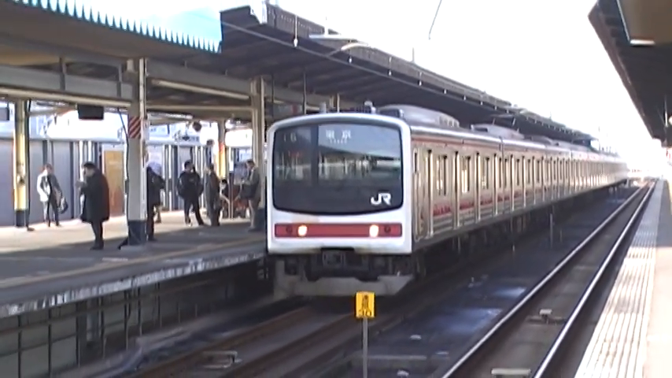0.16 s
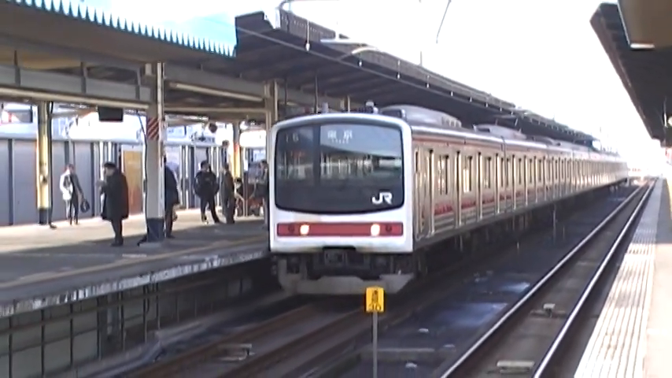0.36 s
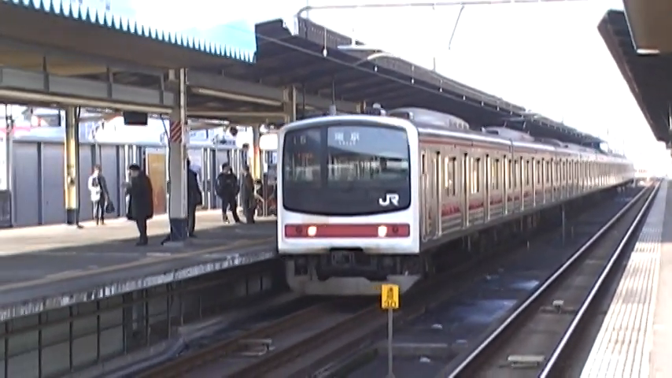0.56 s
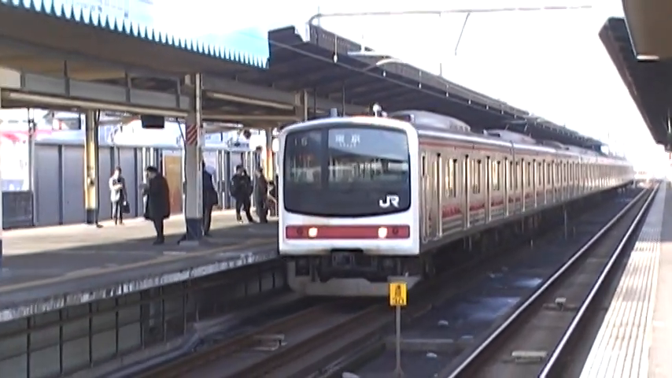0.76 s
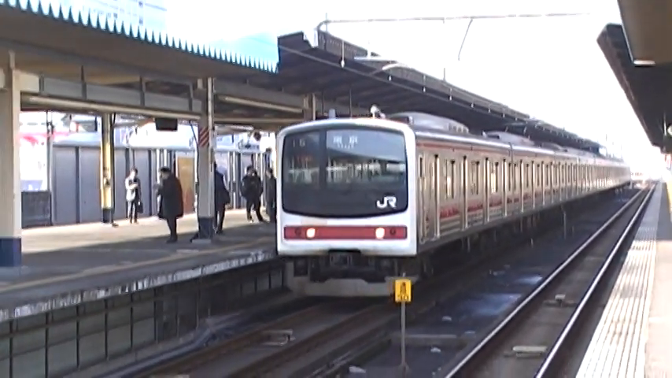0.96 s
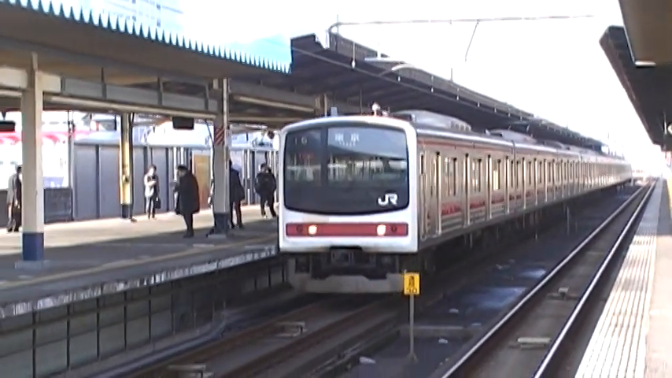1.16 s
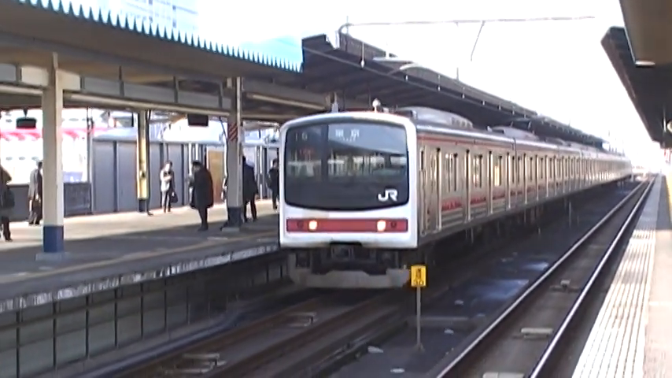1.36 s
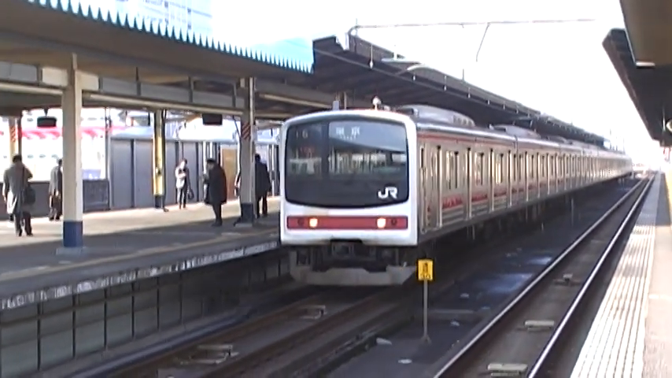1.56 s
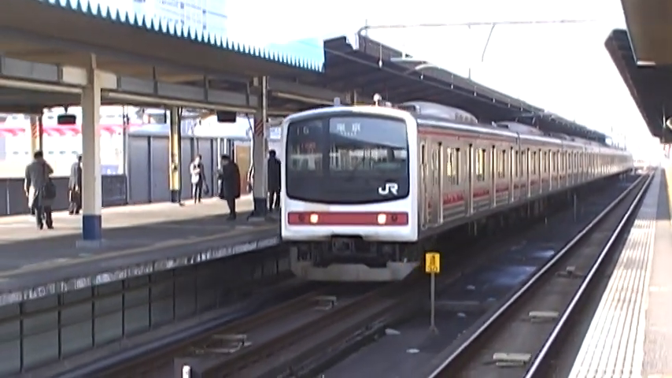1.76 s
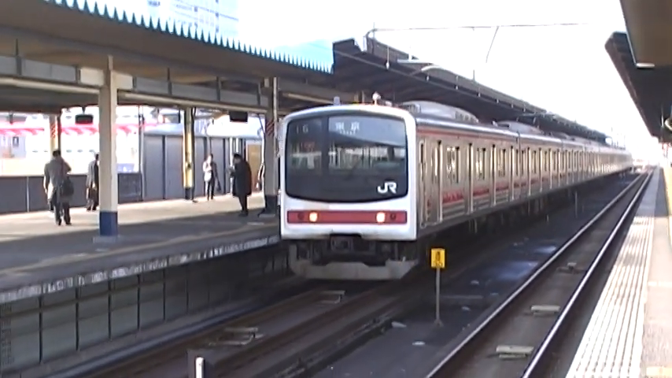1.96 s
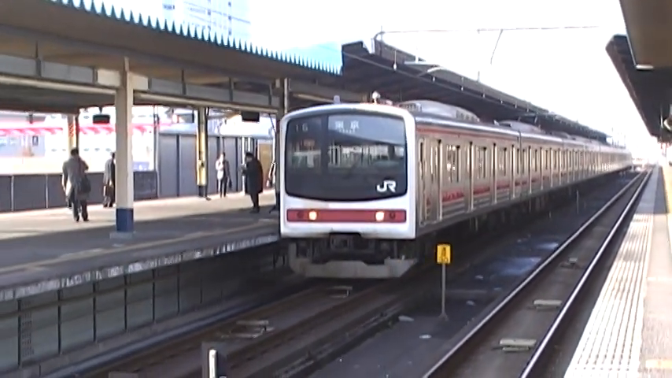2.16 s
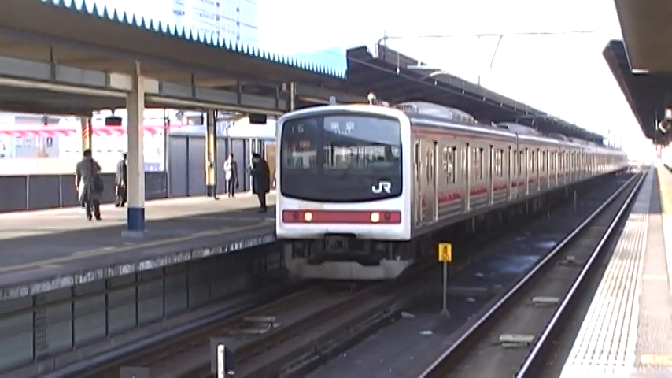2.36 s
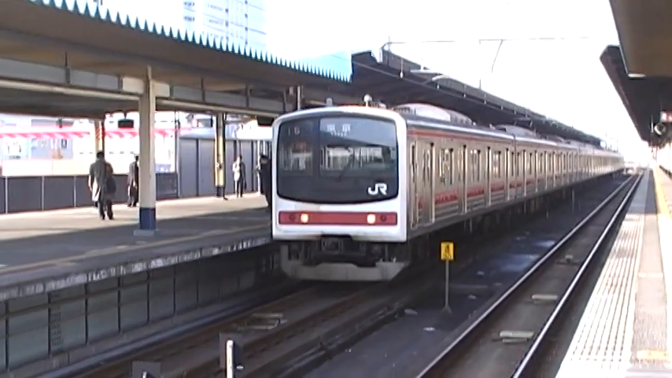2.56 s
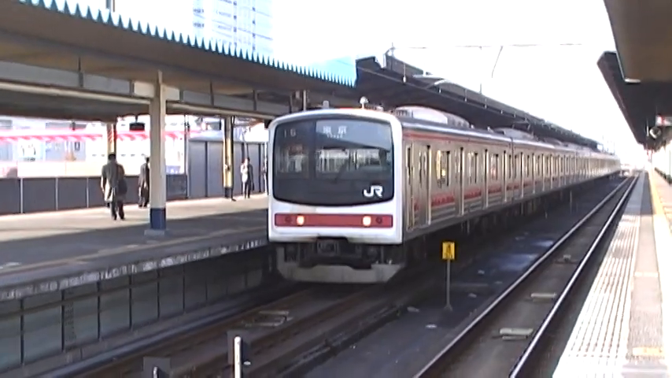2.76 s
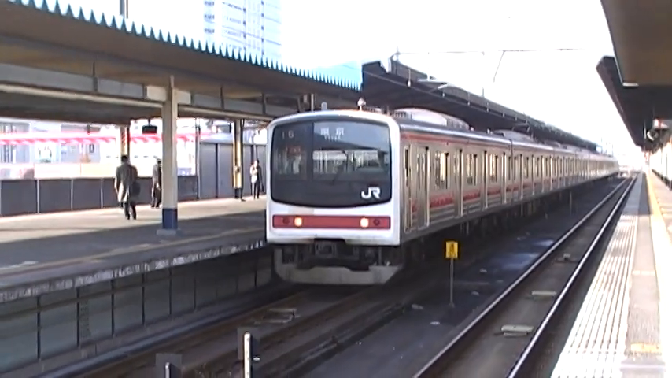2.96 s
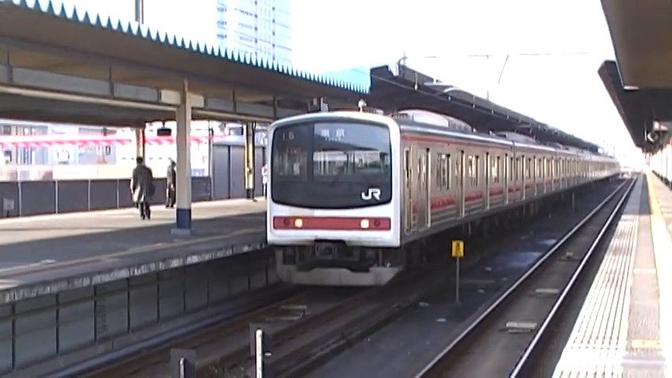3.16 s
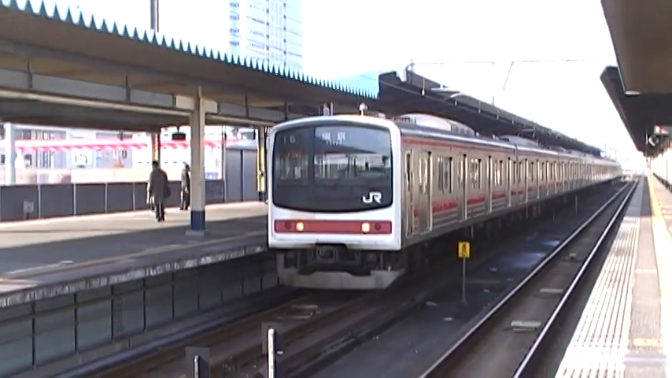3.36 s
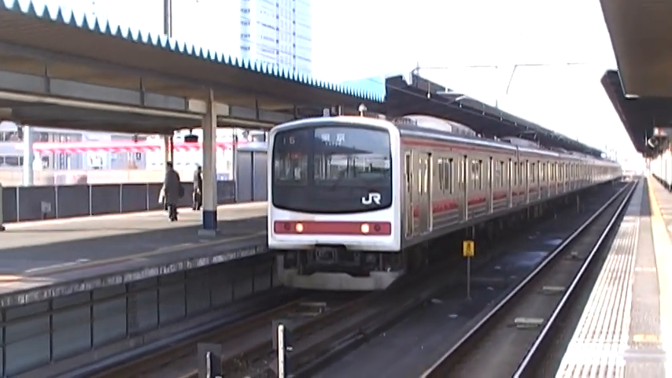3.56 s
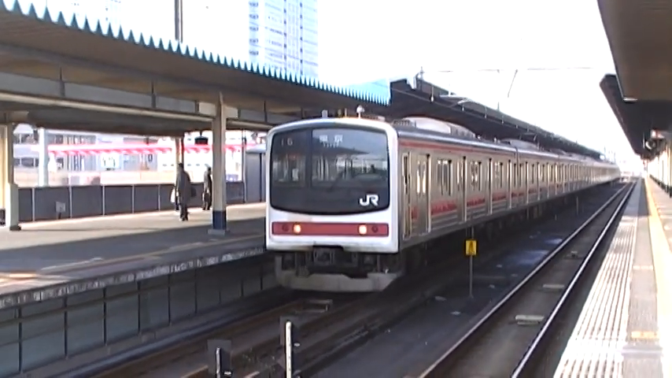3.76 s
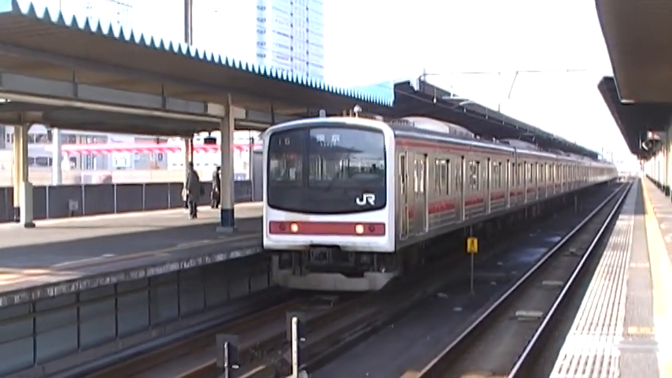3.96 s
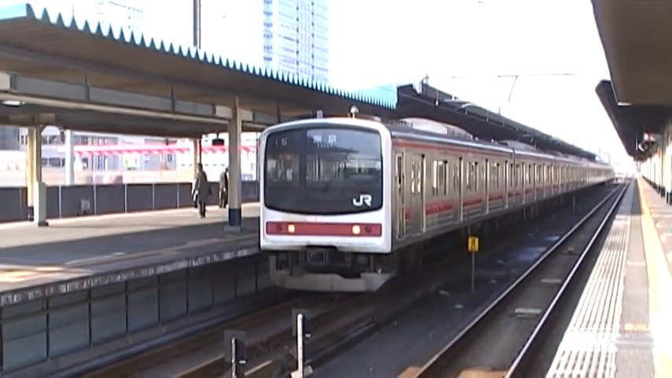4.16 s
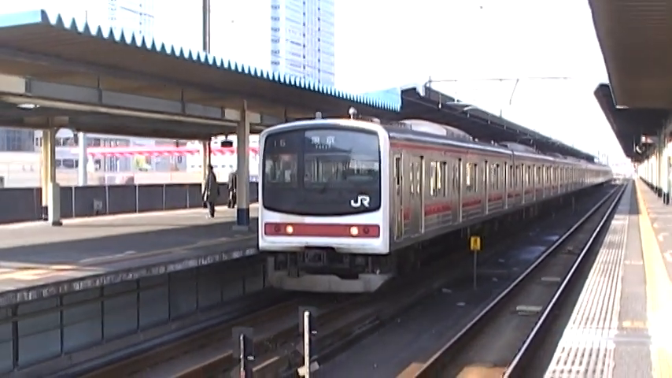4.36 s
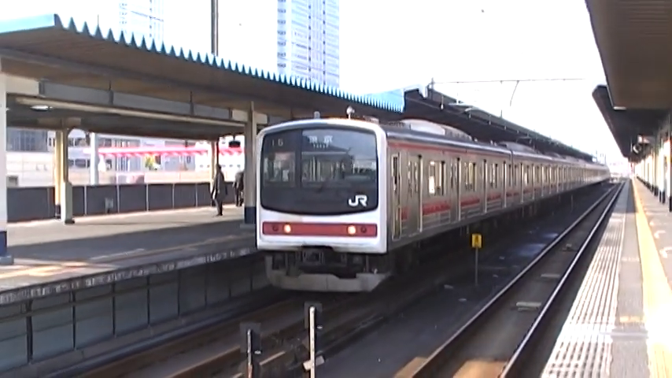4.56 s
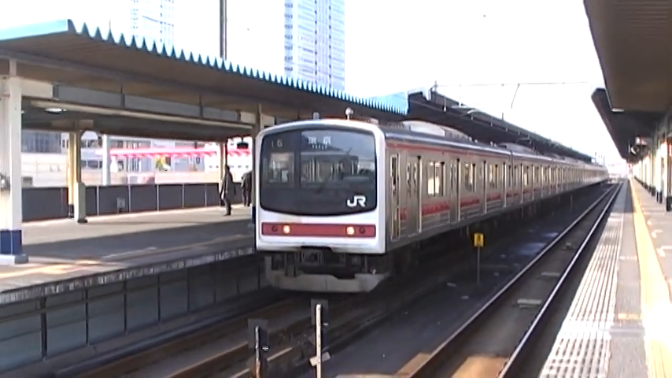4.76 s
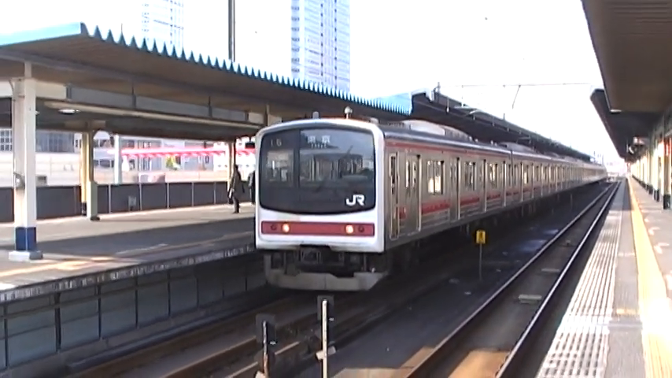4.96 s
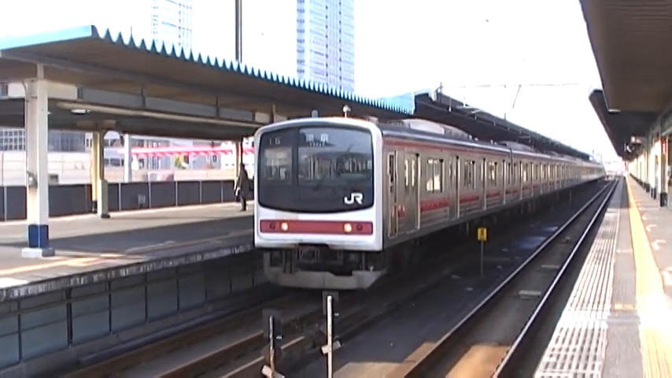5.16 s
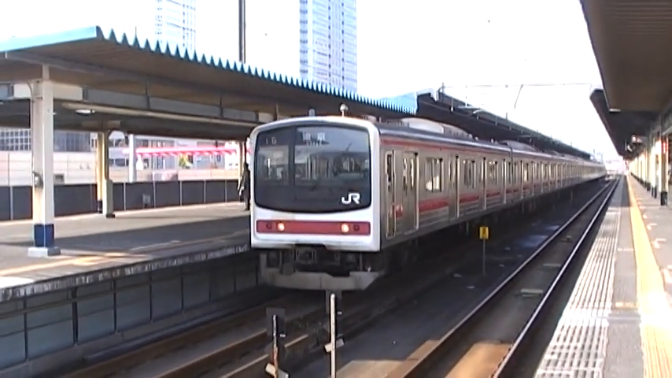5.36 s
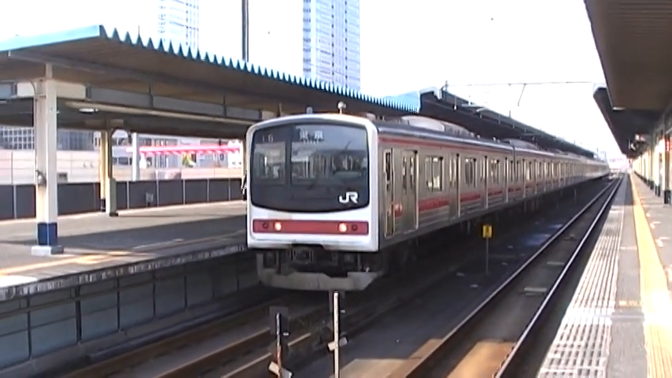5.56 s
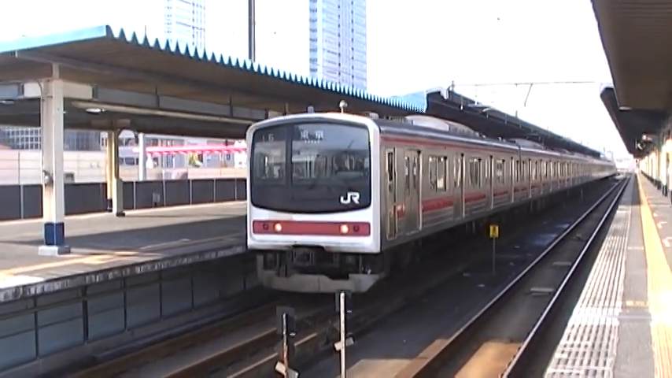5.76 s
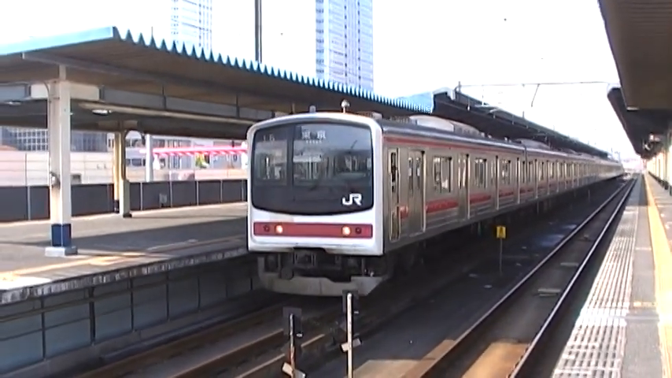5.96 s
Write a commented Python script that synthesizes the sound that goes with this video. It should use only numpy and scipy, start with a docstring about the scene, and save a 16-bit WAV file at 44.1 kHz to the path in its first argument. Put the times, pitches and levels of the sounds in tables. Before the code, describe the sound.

A commuter train brakes beside a covered platform. Low rumble and rolling roar gradually fade over steady airy station noise. Gritty falling chirps and higher squeals repeat with every wheel turn, growing louder and more widely spaced, while a wavering metallic singing swells beneath. Near the end come clean shrieks and two hoarse crow-like caws. The wide stereo microphone stands on the platform, with the brakes slightly left and a short bright echo from the roof.

```python
"""An electric commuter train brakes along a roofed platform, slowing and coming nearer.
From the start filtered noise gives its fading rumble and roar over steady station noise, and steadily
rubbing shoes sing by stick-slip. Wheel spots meet the shoes once a turn, so a pattern of falling chirps
and high squeals repeats ever slower and louder, answered by a decaying-noise echo of the roof.
Near the end come clean shrieks and two hoarse calls, likely a crow: a rough voice through a throat resonance."""
import sys
import numpy as np
from scipy import signal
from scipy.fft import rfft, irfft, next_fast_len
from scipy.io import wavfile
from scipy.ndimage import map_coordinates

SR = 44100
rng = np.random.default_rng(int(sys.argv[2]) if len(sys.argv) > 2 else 0)


def materialize(psi):
    """Save the field psi as 16-bit PCM at rate SR to the path in sys.argv[1].

    A 1-D psi becomes a single channel; in a 2-D psi each row is a channel.
    """
    bounded = np.clip(np.atleast_2d(psi).T, -1, 1)
    quanta = np.round(bounded * 32767).astype(np.int16)
    wavfile.write(sys.argv[1], SR, quanta)


N = 268965


def amp(db):
    """Logarithmic level: decibels to amplitude gain."""
    return 10 ** (np.asarray(db) / 20)


def unit(x):
    """Root-mean-square normalisation: scale to rms 1."""
    return x / np.sqrt(np.mean(x ** 2) + 1e-20)


def along(points, hz):
    """Logarithmic frequency scale: interpolate (frequency, value) points on it."""
    f, v = np.transpose(points)
    return np.interp(np.log(hz + 1), np.log(f + 1), v)


def wobble(rate, size=N):
    """Band-limited random fluctuation: a smooth curve through rate random knots a second."""
    knots = rng.standard_normal(size // 16 + 8)
    return map_coordinates(knots, [np.arange(size) * rate / SR], mode="wrap")


def filtered(x, response):
    """Linear filtering: multiply the spectrum by a response of frequency."""
    m = next_fast_len(N + SR // 4)
    return irfft(rfft(x, m) * response(np.fft.rfftfreq(m, 1 / SR)), m)[..., :N]


# Likeness of left and right in wide noise: (frequency [Hz], correlation [0-1])
LEFT_RIGHT_LIKENESS = [(40, 0.94), (150, 1), (400, 0.96), (800, 0.92), (1600, 0.82), (8000, 0.56)]


def rush(spectrum):
    """Partial coherence: coloured stereo noise of rms 1, nearly mono in the bass."""
    def mid_side_response(hz):
        # mid and side at this angle give the wanted left-right correlation
        angle = np.arccos(np.clip(along(LEFT_RIGHT_LIKENESS, hz), -1, 1)) / 2
        return amp(along(spectrum, hz)) * [np.cos(angle), np.sin(angle)]

    mid, side = filtered(rng.standard_normal((2, N)), mid_side_response)
    return unit(np.array([mid + side, mid - side]))


def gate(t, length, rise, fall):
    """Onset and free decay: swell, hold until length, then ring out exponentially (all in s)."""
    return (1 - np.exp(-(t / rise) ** 2)) * np.exp(-np.maximum(t - length, 0) / fall)


def add(track, s, sound):
    """Superposition: mix a sound into the track at time s."""
    start = max(round(s * SR), 0)
    track[start:start + len(sound)] += sound[:max(len(track) - start, 0)]


def stick_slip(hz, partials_db, jitter, jitter_rate, flutter_db):
    """Stick-slip oscillation: harmonics of a trembling pitch, at a strength that flutters."""
    size = len(hz)
    phase = 2 * np.pi * np.cumsum(hz * (1 + jitter * wobble(jitter_rate, size))) / SR
    tone = sum(amp(db) * np.sin((k + 1) * phase) for k, db in enumerate(partials_db))
    return np.sqrt(2) * tone * unit(amp(flutter_db * wobble(90, size)))


# starting speed (turns/s), braking (turns/s^2), growth of the braking term (turns/s^3)
SPIN, BRAKING, BRAKING_GROWTH = 1.9806, 0.1703, 0.0132


def wheel():
    """Kinematics of braking: time (s), speed (turns/s) and turns made, per sample."""
    t = np.arange(N) / SR
    speed = SPIN - BRAKING * t - BRAKING_GROWTH * t ** 2
    return t, speed, np.cumsum(speed) / SR


# Noise spectra of cars, wheel on rail, and station: (frequency [Hz], relative density [dB per Hz])
RUMBLE_SPECTRUM = [(22, -64), (35, -34), (52, -21), (75, -14), (100, -7.5), (145, -10.5), (210, -2),
                   (260, -2.5), (315, 1), (500, -4.5), (620, -8), (850, -48), (1400, -120)]
ROAR_SPECTRUM = [(400, -40), (600, -12), (720, -5), (805, 0), (920, -7.5), (1200, -11.5), (1700, -18),
                 (2300, -18.5), (3400, -35), (6000, -42), (12000, -80)]
STATION_SPECTRUM = [(400, -29), (700, 0), (1000, -0.5), (1500, -2), (1750, -5), (2100, -3.5), (2350, -7),
                    (3400, -13), (6000, -18), (9000, -21.5), (12000, -36), (15000, -45)]
RUMBLE_DB, ROAR_DB, STATION_DB = -42, -38, -45  # rumble and roar at the starting speed
RUMBLE_FALL_DB, ROAR_FALL_DB = 2, 4.8  # lost each time the speed halves


def rolling():
    """Rolling noise: car rumble and wheel-rail roar weaken with speed, over steady station noise."""
    halvings = np.log2(SPIN / wheel()[1])
    rumble = amp(RUMBLE_DB - RUMBLE_FALL_DB * halvings) * rush(RUMBLE_SPECTRUM)
    roar = amp(ROAR_DB - ROAR_FALL_DB * halvings) * rush(ROAR_SPECTRUM)
    return rumble + roar + amp(STATION_DB) * rush(STATION_SPECTRUM)


def slack(s, full_s, growth):
    """Growing friction: decibels by which a rubbing place falls short of its full bite at time s."""
    return growth * np.maximum(full_s - s, 0)


# Low, main and high mode of steadily rubbing shoes:
# (full level [dB], time of full level [s], growth [dB/s], swell once a turn [dB])
SINGING_MODES_TABLE = [(-32, 5.28, 4.5, 2.5), (-31, 4.77, 5, 2), (-33, 5.85, 6.5, 3.7)]
SWELL_ANGLE = 0.67  # where the shoes rub hardest (turns)


def singing():
    """Sustained friction modes: many wheels down the train ring at nearly fixed pitches, swelling each turn."""
    t, _, turns = wheel()
    rub = np.cos(2 * np.pi * (turns - SWELL_ANGLE))
    low_db, main_db, high_db = [
        db - slack(t, full_s, growth) + swell_db * rub
        for db, full_s, growth, swell_db in SINGING_MODES_TABLE]

    def drift(hz, depth):
        return hz * (1 + depth * wobble(14))

    def swell(db, depth_db):
        return amp(db) * unit(amp(depth_db * wobble(13)))

    low = stick_slip(drift(2545, 0.013), [-0.5, -14.5, -19, -32],
                     jitter=0.0135, jitter_rate=240, flutter_db=4.5)
    main = stick_slip(drift(2880, 0.014), [0, -13, -21.5, -30],
                      jitter=0.015, jitter_rate=260, flutter_db=1.5)
    high = stick_slip(drift(4980, 0.00675), [0, -24], jitter=0.00561, jitter_rate=200, flutter_db=5.5)
    top = stick_slip(drift(8760, 0.0081), [0], jitter=0.00313, jitter_rate=200, flutter_db=7)
    faint = stick_slip(drift(2092, 0.00297), [0], jitter=0.00505, jitter_rate=110, flutter_db=12.0)
    lower_modes = swell(low_db, 1.4) * low + swell(main_db, 4.06) * main + amp(-59.5) * faint
    return lower_modes + swell(high_db, 3.04) * high + swell(high_db - 7.5, 6.45) * top


APPROACH_DB_PER_S, NEAREST_S = 1, 6.04  # loss is zero at NEAREST_S


def distance_db(s):
    """Distance attenuation: decibels lost at time s because the train is still far off."""
    return APPROACH_DB_PER_S * (NEAREST_S - s)


PASS_SCATTER_DB, PASS_DETUNE = 0.54, 0.00403  # standard deviations: level (dB), share of the pitch


def passes(angle):
    """Periodic excitation: each meeting of spot and shoe as (s, turns/s, chance dB, pitch factor)."""
    t, speed, turns = wheel()
    at = np.searchsorted(turns, np.arange(angle, turns[-1], 1))
    chance = rng.standard_normal((len(at), 2))
    return zip(t[at], speed[at], PASS_SCATTER_DB * chance[:, 0], 1 + PASS_DETUNE * chance[:, 1])


# Tread spots that chirp once a turn: (angle [turns], length [s], nominal pitch [Hz],
# full level before distance loss [dB], time of full bite [s], growth [dB/s],
# octave relative to fundamental [dB], scrape [0-1])
CHIRPING_SPOTS = [(0.002, 0.0262, 3020, -23.5, 2.49, 9.5, -8.5, 0.73),
                  (0.093, 0.0272, 2410, -31.0, 1.07, 2.0, -7.5, 1.0),
                  (0.098, 0.031, 2840, -21.3, 2.35, 24, -5.5, 0.97),
                  (0.194, 0.028, 3070, -27.5, 4.58, 2, -9.5, 0.62),
                  (0.278, 0.0313, 2650, -31, 1.25, 3.5, -7.5, 0.6),
                  (0.305, 0.0273, 3070, -24.5, 2.44, 21, -4.5, 0.9),
                  (0.406, 0.031, 2300, -41.3, 2.9, 6.5, -2, 0.6),
                  (0.458, 0.045, 2690, -37.5, 4.3, 6, 2, 0.12),
                  (0.492, 0.032, 2920, -19, 3, 10.5, -5.5, 0.81),
                  (0.533, 0.0625, 2815, -28, 1.95, 22.0, -8.2, 0.41),
                  (0.671, 0.0297, 3000, -20.2, 3.4, 6, -6, 0.74),
                  (0.788, 0.0415, 2960, -24.5, 5.38, 6, -4, 0.8),
                  (0.895, 0.028, 2890, -17, 4.64, 16.5, -12.4, 0.32)]
# The main mode locking into clean shrieks at a crawl: (time [s], length [s], nominal pitch [Hz], level [dB])
CRAWL_SHRIEKS = [(4.89, 0.062, 2904, -27), (5.146, 0.026, 2950, -19.5), (5.24, 0.05, 2895, -16.5),
                 (5.591, 0.086, 2887, -24.5), (6.059, 0.035, 2900, -18.5)]
SHRIEK_OCTAVE_DB, SHRIEK_SCRAPE = -18.5, 0.12
PITCH_PER_DB = 0.004  # log pitch by which a chirp lies flat for each dB below its full bite


def grabs():
    """Main-mode excitation: every grab as (s, length s, nominal Hz, level dB, octave dB, scrape)."""
    rows = [(*shriek, SHRIEK_OCTAVE_DB, SHRIEK_SCRAPE) for shriek in CRAWL_SHRIEKS]
    for angle, length, hz, db, full_s, growth, octave_db, scrape in CHIRPING_SPOTS:
        for s, _, chance_db, detune in passes(angle):
            short_db = slack(s, full_s, growth)
            pitch = hz * detune * np.exp(-PITCH_PER_DB * short_db)
            level_db = db - short_db - distance_db(s) + chance_db
            rows.append((s, length, pitch, level_db, octave_db, scrape))
    return rows


# Noise of dry rubbing: (frequency [Hz], relative density [dB per Hz])
GRIT_SPECTRUM = [(1800, -52), (2500, -4), (3100, -7), (3650, -29), (4500, -10), (5500, -2), (7500, -2.5),
                 (9500, -7), (11000, -18), (15000, -36)]


def chirps():
    """Stick-slip under load: a hard grab starts sharp and gritty and sags in pitch; a soft one sings clean."""
    track, rubbing, t = np.zeros(N), np.zeros(N), np.arange(SR // 4) / SR
    for s, length, hz, db, octave_db, scrape in grabs():
        scrape = np.clip(scrape, 0, 1)
        sag = 1 + 0.082 * scrape * (np.exp(-t / (0.612 * length)) - 0.42)
        # high overtones lose level with distance a second time
        treble_db = octave_db - distance_db(s)
        partials_db = [0, octave_db, treble_db - 5, treble_db - 20.5, treble_db - 37]
        tone = stick_slip(hz * sag, partials_db,
                          jitter=0.0027 + 0.029 * scrape, jitter_rate=799, flutter_db=3.5)
        force = amp(db) * gate(t, length, rise=0.0043, fall=0.0063)
        add(track, s, force * tone)
        add(rubbing, s, force * amp(octave_db - 19) * scrape ** 2)
    return track + rubbing * unit(rush(GRIT_SPECTRUM)[0])


# Tread spots that squeal in a higher mode: (angle [turns], arc at full bite [turns],
# nominal start, middle and end pitch [Hz], full level before distance loss [dB],
# time of full bite [s], growth [dB/s], upper mode relative [dB])
SQUEALING_SPOTS = [(0.023, 0.077, 4335, 4270, 4720, -27.5, 2.6, 10, -20),
                   (0.224, 0.083, 4490, 4230, 4655, -25.5, 3.6, 11.5, -28.4),
                   (0.379, 0.192, 4609, 4260, 4620, -26, 4.9, 4.5, -23.5),
                   (0.454, 0.06, 4420, 4260, 4487, -25.5, 1.93, 8.0, -11.5),
                   (0.674, 0.065, 4500, 4330, 4190, -25, 4.58, 8.0, -13.9),
                   (0.754, 0.097, 4430, 4220, 4514, -26.5, 3.13, 6.5, -21),
                   (0.96, 0.048, 4330, 4340, 4750, -23, 4.2, 7, -11)]
ARC_PER_DB = 0.01  # log length by which a squeal is longer for each dB below its full bite


def squeals():
    """Higher-mode stick-slip: pitch mostly dips at the bite and whips up on release; an upper mode joins."""
    track, t = np.zeros(N), np.arange(SR // 2) / SR
    for angle, arc, start_hz, middle_hz, end_hz, db, full_s, growth, upper_db in SQUEALING_SPOTS:
        for s, speed, chance_db, detune in passes(angle):
            short_db, far_db = slack(s, full_s, growth), distance_db(s)
            length = arc / speed * np.exp(ARC_PER_DB * short_db)
            u = np.minimum(t / length, 1)  # progress through the squeal
            pitch = middle_hz + (start_hz - middle_hz) * (1 - u) ** 4 + (end_hz - middle_hz) * u ** 5
            pitch = pitch * detune * (1 + 0.008 * wobble(35.14, len(t)))
            tone = stick_slip(pitch, [0, -10 - far_db, -39 - far_db],
                              jitter=0.0091, jitter_rate=400, flutter_db=4.0)
            upper = stick_slip(7080 * (1 + 0.009 * (0.4 - u)), [upper_db],
                               jitter=0.0185, jitter_rate=260, flutter_db=10.5)
            level_db = db - short_db - far_db + chance_db + 1.9 * wobble(30.1, len(t))
            force = amp(level_db) * gate(t, length, rise=0.0052, fall=0.003)
            # keep the squeal centred on its arc
            add(track, s + (arc / speed - length) / 2, force * (tone + upper))
    return track


# Decay of the roof's echo: (frequency [Hz], time to fall 60 dB [s])
ROOF_DECAY = [(500, 0.88), (3000, 0.99), (6000, 0.43), (12000, 0.2)]
# Width of the echoes: (frequency [Hz], side amplitude relative to mid [ratio])
ECHO_WIDTH = [(3000, 0.4), (4500, .25), (6000, 0.23), (8500, 0.72), (11500, 0.72)]


def platform(x, wet_db, early, early_life):
    """Reverberation: track bed and car sides answer at once; the roof adds a longer, weaker tail."""
    hz, t, z = signal.stft(rng.standard_normal((2, SR // 2)), SR, nperseg=256)
    decay = amp(-60 * t / along(ROOF_DECAY, hz)[:, None]) * (1 + early * np.exp(-t / early_life))
    width = np.array([np.ones_like(hz), along(ECHO_WIDTH, hz)])[:, :, None]
    tail = signal.istft(z * decay * width, SR, nperseg=256)[1]
    mid, side = signal.fftconvolve(x[None], tail / np.linalg.norm(tail[0]), axes=1)[:, :N]
    echo = np.array([mid + side, mid - side])
    return (x + amp(wet_db) * echo) / np.hypot(1, amp(wet_db))


# The crow's calls: (time [s], length before the fall [s], level [dB])
CAW_CALLS = [(5.042, 0.41, -35.5), (5.806, .36, -36)]
# Throat resonance: (frequency [Hz], relative gain [dB])
THROAT_RESONANCE = [(300, -60), (780, -25), (930, -12), (1060, 1), (1220, -4), (1420, -2.5), (1600, -19),
                    (1800, -23), (2400, -30), (5000, -90)]


def crow():
    """Source and filter: two caws of rough voice and turbulence in one throat resonance, rattling."""
    level, t = np.zeros(N), np.arange(SR) / SR
    for s, length, db in CAW_CALLS:
        add(level, s, amp(db) * gate(t, length, rise=0.073, fall=0.095))
    pitch_hz, rattle_hz = 402, 32
    throat_db = along(THROAT_RESONANCE, pitch_hz * np.arange(1, 6))
    voice = unit(stick_slip(pitch_hz * (1 + 0.015 * wobble(8.2)), throat_db,
                            jitter=0.0351, jitter_rate=160, flutter_db=2.5))
    rattle_phase = 2 * np.pi * np.cumsum(rattle_hz * (1 + 0.042 * wobble(8))) / SR
    rattle = amp(2.6 * np.sin(rattle_phase))
    return level * unit(rattle * (amp(-3.5) * voice + rush(THROAT_RESONANCE)))


def scene():
    """Level-difference panning: brakes slightly left, rolling noise and crow slightly right."""
    screech = platform(chirps() + squeals(), wet_db=-1.5, early=1.1, early_life=0.021)
    ringing = platform(singing(), wet_db=-4.0, early=0.96, early_life=0.018)
    background = rolling() + crow()
    return (screech + ringing) * amp([[0.35], [-0.35]]) + background * amp([[-0.5], [0.5]])


TOP_HZ = 15400


def record(dry):
    """Band limiting: an ideal low-pass keeps nothing at or above TOP_HZ."""
    return filtered(dry, lambda hz: hz < TOP_HZ)


dry = scene()
out = record(dry)
materialize(out)
```